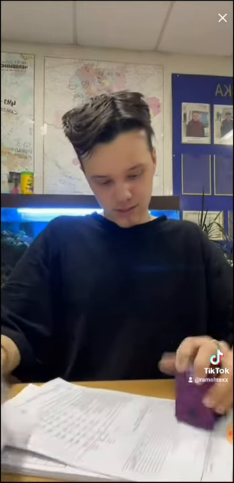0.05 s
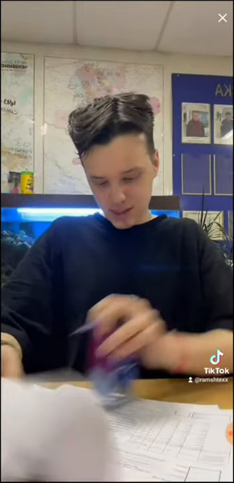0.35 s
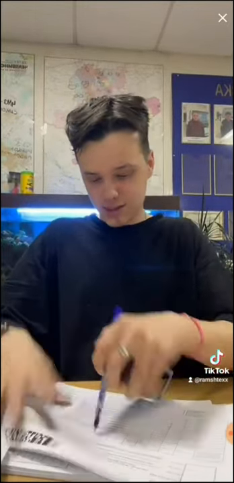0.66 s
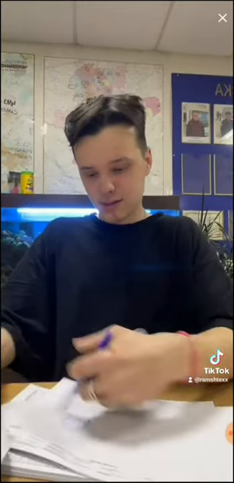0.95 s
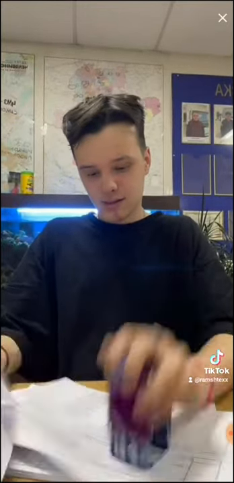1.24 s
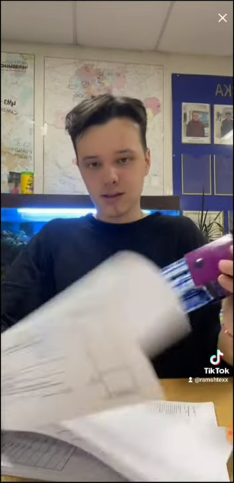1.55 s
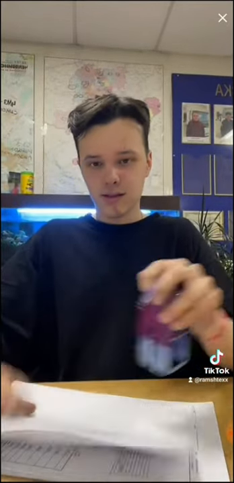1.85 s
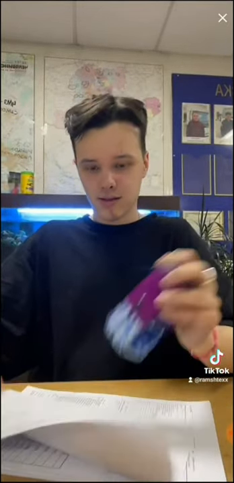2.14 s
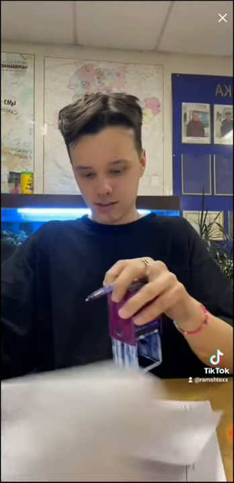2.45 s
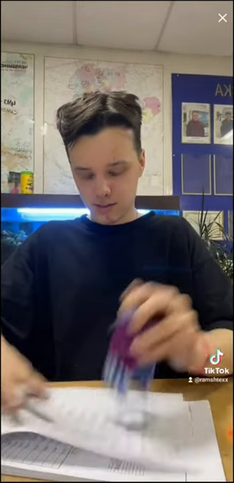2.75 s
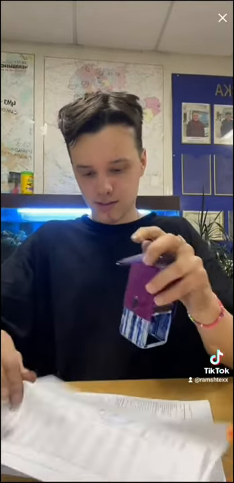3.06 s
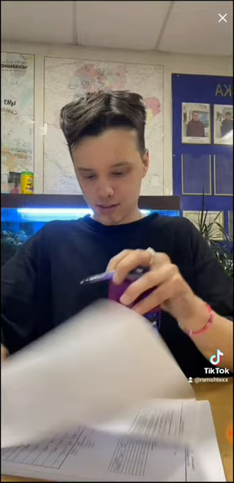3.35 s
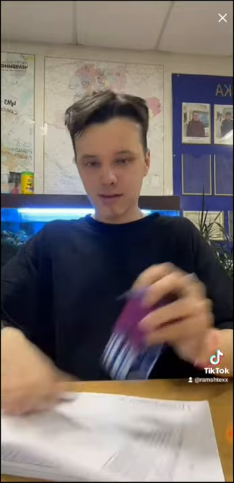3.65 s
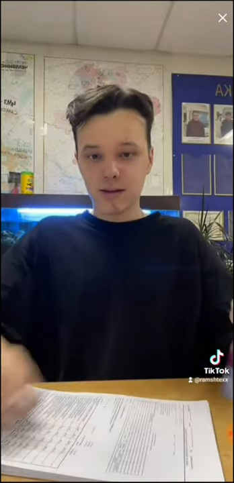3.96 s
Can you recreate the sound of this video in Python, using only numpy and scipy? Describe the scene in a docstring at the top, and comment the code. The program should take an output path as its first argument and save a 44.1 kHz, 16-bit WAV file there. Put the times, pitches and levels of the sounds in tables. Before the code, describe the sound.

A self-inking stamp thumps and clacks rapidly on papers as sheets rustle and flip.

```python
"""Papers are stamped in quick succession on an office desk, close to a phone in a small, humming room. First
the die of a self-inking stamp thuds on the stack, shaking the desk, and the stamp clicks and rattles. Next the
spring throws the housing back with a clack, and it rings against its top stop. Then the housing scrapes down
for the next stroke; the die lands nine times in all. Between strokes the sheets slide, flap and snap as they
are turned; one sings briefly, and later one falls with a puff."""
import sys
import numpy as np
from scipy import signal
from scipy.fft import rfft, irfft
from scipy.io import wavfile
from scipy.ndimage import uniform_filter1d, minimum_filter1d

SR = 44100
rng = np.random.default_rng(int(sys.argv[2]) if len(sys.argv) > 2 else 0)


def transcribe(u):
    """Save the signal u as a 16-bit wav file named by the first command-line argument.

    u: samples, shape (n,) or (channels, n), limited to [-1, 1]; the rate is SR.
    q: integer samples, one column per channel.
    """
    v = np.clip(np.atleast_2d(u).T, -1, 1)
    q = np.round(v * 32767).astype(np.int16)
    wavfile.write(sys.argv[1], SR, q)


N = 176400

# the die lands on the stack (time [s], knock level [dB], desk level [dB])
LANDINGS = [(.0, -22.5, -29.5), (0.23, -17, -33), (.459, -15, -29.5), (.848, -15.5, -28.5),
            (1.2395, -11, -27), (1.696, -16, -31), (2.395, -20, -30.5), (3.043, -20, -30),
            (3.916, -18.5, -36.5)]
# hard clicks of the stamp: the die striking the stack, ticks of the descending housing, and loose plastic parts
# (time [s], body level [dB], treble level [dB])
STAMP_CLICKS = [(0.038, -29, -29.5), (0.23, -28, -25), (0.266, -30.5, -31), (.443, -32, -27), (.524, -27.5, -34),
                (0.792, -26.5, -28), (0.883, -29.5, -31), (0.915, -28.5, -36), (1.163, -29.5, -31),
                (1.23, -32, -25), (1.269, -24, -29), (1.305, -26, -36), (1.313, -27, -29), (1.739, -29, -29),
                (2.437, -33, -35), (3.0407, -29, -26), (3.964, -35, -36)]
# sheets slide (time [s], duration [s], body level [dB], hiss level [dB])
SLIDES = [(0.057, 0.19, -33, -39), (0.268, 0.084, -39, -40), (0.356, 0.11, -32.5, -40.5),
          (0.56, 0.06, -33.5, -41), (0.611, 0.14, -41, -51.5), (0.733, 0.13, -40, -40.5),
          (0.938, 0.24, -37, -43), (1.332, 0.12, -39, -60), (1.471, .12, -36, -38.5),
          (1.601, 0.073, -38.5, -45), (1.814, 0.034, -41, -47), (1.841, 0.12, -40.5, -39.5),
          (2.038, 0.029, -42, -72), (2.088, 0.03, -50.5, -41), (2.151, 0.1, -31.5, -68),
          (2.258, 0.08, -32, -62), (2.463, 0.19, -42.5, -41.5), (2.662, 0.12, -50, -48),
          (2.801, 0.115, -36.5, -40.5), (2.93, 0.074, -34.5, -46.5), (3.058, 0.056, -34, -38),
          (3.119, 0.24, -43, -42.5), (3.355, 0.5, -52, -48.5), (3.727, 0.13, -37.5, -47.5),
          (3.934, 0.16, -35, -46)]
# the spring throws the housing up (time [s], duration [s], level [dB])
RETURNS = [(0.0616, 0.012, -23.5), (.290, 0.0059, -22), (0.535, 0.0049, -12), (0.925, 0.0014, -10.5),
           (1.323, 0.0018, -10.5), (1.764, 0.016, -26), (2.4586, 0.014, -25), (3.111, .013, -24),
           (3.990, 0.0067, -24.5)]
# the housing meets its top stop (time [s], level [dB], tuning [ratio])
STOPS = [(.073, -40, 1.4), (0.299, -25.5, 1), (.540, -15.5, 1.01), (.930, -23.5, 0.99), (1.328, -18, 1.01),
         (1.775, -20, .99), (2.470, -26.5, 1.03), (3.121, -25, 0.98)]
# the housing slides down its frame (time [s], duration [s], level [dB])
PRESSES = [(.193, 0.026, -25.5), (.422, 0.036, -24.5), (.809, 0.023, -24), (1.201, 0.025, -23.5),
           (1.662, 0.032, -22), (2.361, 0.029, -24), (3.006, 0.024, -23), (3.8812, 0.03, -22.5)]
# sheets flap and crumple (time [s], duration [s], body level [dB], treble level [dB])
FLAPS = [(.398, 0.0054, -24, -32), (.753, 0.0076, -28, -26.5), (1.072, 0.0089, -33, -29.5),
         (1.103, 0.012, -27, -26.5), (1.121, 0.015, -30, -26.5), (1.854, 0.021, -28, -31),
         (1.919, 0.005, -27.5, -36), (2.166, 0.029, -30.5, -37), (2.212, 0.0061, -27, -30),
         (2.279, 0.011, -24, -33), (2.538, 0.0075, -27, -46), (2.937, 0.005, -23.5, -29),
         (2.974, 0.0067, -24, -25.5), (3.473, 0.0075, -32.5, -41), (3.541, 0.0074, -34, -33)]
# a sheet buckles (time [s], body level [dB], treble level [dB])
SNAPS = [(.747, -25, -32), (1.048, -28, -41), (1.507, -23.5, -21), (1.585, -30, -27), (1.865, -24, -21.5),
         (1.952, -26.5, -21), (2.165, -24, -24.5), (2.301, -23, -33), (2.5325, -24.5, -26.5),
         (2.6309, -19, -19), (2.817, -22, -22.5), (2.861, -18, -18.5), (2.962, -40, -30), (3.291, -32, -26),
         (3.311, -25, -48), (3.3359, -23, -18.5), (3.601, -23, -25.5)]

# modes of die, coil spring and housing (frequency before tuning [Hz], level [dB], T60 [s])
DIE_MODES = [(723, -9, 0.051), (874, -13.5, 0.081), (1150, -5.5, 0.017), (1476, -14.5, 0.068),
             (1610, -4.5, 0.031), (1770, 3, 0.013)]
COIL_MODES = [(2376, 6.5, 0.021), (2831, -6.5, 0.03)]
HOUSING_MODES = [(880.4, 4.5, 0.043), (874, -22, 0.44), (955, -5, 0.051), (1627, 3, 0.026),
                 (1550, -20, 0.046)]

# spectra of the noisy sources (frequency [Hz], relative level [dB])
AIR_SPECTRUM = [(25, -7), (60, 8), (200, -12), (900, 1.5), (14000, -10)]
DESK_SPECTRUM = [(60, -45), (130, -20.5), (240, -7.5), (600, -3.5), (800, 2.5), (1200, -7), (3000, -14.5),
                 (8000, -21.5)]
BODY_SPECTRUM = [(120, -35), (300, -23.5), (480, -22), (650, -10), (850, -1), (1250, 0), (1600, 3),
                 (2800, 0.5), (4200, -13), (8000, -48)]  # midrange of paper and stamp clicks
HISS_SPECTRUM = [(500, -40), (1800, -18), (3900, 4), (5500, 3.5), (7500, -2), (14000, -8.5)]  # treble of slides and stamp clicks
CLACK_SPECTRUM = [(150, -15.5), (550, -2), (880, 6), (1300, 1), (2500, 9.5), (4500, 7.5), (7500, 3.5),
                  (14000, -5)]
SCRAPE_SPECTRUM = [(150, -29.5), (500, -10.5), (800, 2.5), (1300, -4.5), (2600, 0), (5000, -1), (7500, -6),
                   (14000, -13)]
CRACK_SPECTRUM = [(600, -54), (2300, 6), (4800, 9), (7500, -2.5), (14000, -13)]  # treble of flaps and snaps
# response of the phone's microphone (frequency [Hz], gain [dB])
MICROPHONE = [(20, -6), (1650, 1), (2000, -3.5), (2400, 0), (2850, 2.5), (3350, -9), (4000, -0.5),
              (4600, -6.5), (6700, -1), (7500, 8), (8600, -3), (10000, -16.5), (11400, -9), (12700, -26),
              (15000, -26.5)]


def undb(db):
    """Amplitude ratio of a level in decibels."""
    return 10 ** (np.asarray(db) / 20)


def clock(seconds):
    """Sampled time axis of a given duration."""
    return np.arange(max(int(seconds * SR), 8)) / SR


def decay(t, t60):
    """Exponential damping: 60 dB down after t60 seconds."""
    return np.exp(-np.log(1000) * t / t60)


def add(track, start, sound):
    """Superposition: a sound joins a track at its start time."""
    i = int(np.clip(start * SR, 0, N - 1))
    track[i:i + len(sound)] += sound[:N - i]


def response(points, size=2048):
    """Minimum-phase impulse response of a spectrum, by folding its cepstrum."""
    hz, db = np.array(points, float).T
    f = np.maximum(np.fft.rfftfreq(size, 1 / SR), 1)
    cepstrum = irfft(np.log(undb(np.interp(np.log(f), np.log(hz), db))))
    cepstrum[1:size // 2] *= 2
    cepstrum[size // 2 + 1:] = 0
    return irfft(np.exp(rfft(cepstrum)))


def colour(x, spectrum):
    """A unit-energy filter shapes a white sound and conserves its power."""
    impulse = response(spectrum)
    return signal.fftconvolve(x, impulse / np.linalg.norm(impulse))[:N]


def wander(rate_hz):
    """Random modulation: Gaussian values joined by straight lines."""
    return np.interp(np.arange(N) * rate_hz / SR, np.arange(N), rng.standard_normal(N))


def grit(smooth, even_s=.003, clicks_per_s=2500, spread_db=4):
    """Shot noise of uneven clicks over a share of smooth friction, at steady power."""
    clicks = (rng.random(N) < clicks_per_s / SR) * rng.choice([-1, 1], N)
    clicks = clicks * undb(spread_db * rng.standard_normal(N))
    x = clicks / clicks.std() + smooth * rng.standard_normal(N)
    return x / np.sqrt(uniform_filter1d(x * x, int(even_s * SR)) + 1e-9)


def bursts(rows, attack_s, t60):
    """Envelope of incoherent bursts (time [s], duration [s], level [dB]), which add in power."""
    power = np.zeros(N)
    for start, length, db in rows:
        t = clock(length + t60)
        envelope = undb(db) * np.minimum(t / attack_s, 1) * decay(np.maximum(t - length, 0), t60)
        add(power, start, envelope ** 2)
    return np.sqrt(power)


def ring(modes, blows, contact_s, scatter=.012):
    """Free vibration: each blow (time [s], level [dB], tuning [ratio]) excites damped modes."""
    out, t = np.zeros(N), clock(.5)
    hz, mode_db, t60 = np.array(modes, float).T[:, :, None]
    for start, db, tuning in blows:
        tuned_hz = hz * tuning * (1 + scatter * rng.standard_normal(hz.shape))
        waves = np.sin(2 * np.pi * (tuned_hz * t + rng.random(hz.shape)))
        ringing = np.sum(undb(mode_db) * waves * decay(t, t60), axis=0)
        add(out, start, undb(db) * np.minimum(t / contact_s, 1) * ringing)
    return out


def crackles(rows, treble_spectrum, attack_s, body_t60, treble_t60, smooth):
    """Runs of clicks in two bands, each with its own damping."""
    body = bursts([(start, length, db) for start, length, db, _ in rows], attack_s, body_t60)
    treble = bursts([(start, length, db) for start, length, _, db in rows], attack_s, treble_t60)
    return colour(body * grit(smooth), BODY_SPECTRUM) + colour(treble * grit(smooth), treble_spectrum)


def office_air(air_db=-50.5, hum_hz=60, hum_db=-71):
    """Stationary background: broadband air noise and a pure tone of mains hum."""
    hum = np.sqrt(2) * np.sin(2 * np.pi * hum_hz * np.arange(N) / SR)
    return undb(air_db) * colour(rng.standard_normal(N), AIR_SPECTRUM) + undb(hum_db) * hum


def die_knocks(tuning=.98):
    """Impact excites the modes of the die on the stack."""
    return ring(DIE_MODES, [(start, db, tuning) for start, db, _ in LANDINGS], contact_s=.0012)


def desk_shudder(coupling_db=-15.5):
    """Structure-borne sound: each landing, and a share of each scrape, shakes the desk."""
    shake = bursts([(start, 0, db) for start, _, db in LANDINGS], attack_s=.00091, t60=.31)
    shake += undb(coupling_db) * bursts(PRESSES, attack_s=.0029, t60=.024)
    return colour(shake * rng.standard_normal(N), DESK_SPECTRUM)


def room(x, t60=.57, tail_db=-14.5, build_s=.015):
    """Reverberation: a diffuse field builds up and decays behind the direct sound."""
    t = clock(.5)
    tail = rng.standard_normal(len(t)) * decay(t, t60) * np.minimum(t / build_s, 1)
    return x + undb(tail_db) * signal.fftconvolve(x, tail / np.linalg.norm(tail))[:N]


def stamp_clicks(hold_s=.0041):
    """Small hard impacts in the stamp (the die striking, the housing ticking, loose parts rattling), whose
    treble is damped first."""
    rows = [(start, hold_s, db, treble_db) for start, db, treble_db in STAMP_CLICKS]
    return crackles(rows, HISS_SPECTRUM, attack_s=.00039, body_t60=.025, treble_t60=.015, smooth=.43)


def paper_slides(flutter_hz=108.9, depth_db=5):
    """Sliding friction between sheets: a shivering rustle under a steadier hiss."""
    body, hiss = np.zeros(N), np.zeros(N)
    for start, length, db, hiss_db in SLIDES:
        swell = abs(np.sin(np.pi * clock(length) / length)) ** .26  # the sheet speeds up, then slows
        swell /= np.sqrt(np.mean(swell ** 2))
        add(body, start, undb(db) * swell)
        add(hiss, start, undb(hiss_db) * swell)
    flutter_db = depth_db * np.tanh(wander(flutter_hz))
    body *= undb(flutter_db) * grit(smooth=.25, even_s=.023)
    hiss *= undb(.85 * flutter_db) * grit(smooth=1.3, even_s=.0097)
    return colour(body, BODY_SPECTRUM) + colour(hiss, HISS_SPECTRUM)


def bend(x, bands=14, lowest_hz=500, rate_hz=35, depth_db=5):
    """A sheet's resonances shift as it bends, so third-octave bands trade power at random."""
    hz = np.maximum(np.fft.rfftfreq(N, 1 / SR), 1)
    band = np.clip(3 * np.log2(hz / lowest_hz), 0, bands - 1)
    gains = undb(depth_db * np.array([wander(rate_hz) for _ in range(bands)]))
    gains /= np.sqrt(np.mean(gains ** 2, axis=0))
    spectrum = rfft(x)
    return sum(gain * irfft(spectrum * np.maximum(1 - abs(band - k), 0), N)
               for k, gain in enumerate(gains))


def disperse(x, delay_at_1khz_s=.0023):
    """Dispersion: bending waves run faster at high frequency, so clicks leave a sheet as falling chirps."""
    hz = np.fft.rfftfreq(N, 1 / SR)
    phase_lag = 4 * np.pi * delay_at_1khz_s * np.sqrt(1000 * hz)
    return irfft(rfft(x) * np.exp(-1j * phase_lag), N)


def spring_return(tuning=.96, stop_click_db=-8):
    """Stored elastic energy is released: a bright clack, a twang of the coil, a click at the stop."""
    clicks = [(start, 0, db + stop_click_db) for start, db, _ in STOPS]
    clack = bursts(RETURNS + clicks, attack_s=.00025, t60=.032) * grit(smooth=.25)
    twang = ring(COIL_MODES, [(start, db, tuning) for start, _, db in RETURNS], contact_s=.0042)
    return colour(clack, CLACK_SPECTRUM) + twang


def housing_knocks():
    """The hollow housing resonates on striking its top stop."""
    return ring(HOUSING_MODES, STOPS, contact_s=.00088)


def frame_scrape(slip_hz=124.7, jitter=.25, fade_db=19.5, rise_s=.0034):
    """Stick-slip friction: the descending housing catches on its frame; each slip starts hard and fades."""
    cycles = np.cumsum(slip_hz * np.exp(jitter * wander(slip_hz))) / SR + rng.random()
    slips = uniform_filter1d(undb(-fade_db * (cycles % 1)), int(rise_s * SR))
    slips /= np.sqrt(np.mean(slips ** 2))
    scrape = bursts(PRESSES, attack_s=.0013, t60=.052) * slips * grit(smooth=.51)
    return colour(scrape, SCRAPE_SPECTRUM)


def paper_flaps():
    """A sheet crumples as it flaps over and radiates a run of impulses."""
    return crackles(FLAPS, CRACK_SPECTRUM, attack_s=.00029, body_t60=.03, treble_t60=.02, smooth=.25)


def paper_snaps(t60=.0096, tail_db=7, energy_s=.0022):
    """Buckling: a sheet gives way in one impulse with a crinkling tail."""
    body, treble = np.zeros(N), np.zeros(N)
    t = clock(t60)
    for start, db, treble_db in SNAPS:
        tail = rng.standard_normal(len(t)) * decay(t, t60)
        snap = (t == 0) + undb(tail_db) * tail / np.linalg.norm(tail)
        snap *= np.sqrt(energy_s * SR) / np.linalg.norm(snap)  # as much as unit power for energy_s
        add(body, start, undb(db) * snap)
        add(treble, start, undb(treble_db) * snap)
    return colour(body, BODY_SPECTRUM) + colour(treble, CRACK_SPECTRUM)


def edge_swish(start=1.36, length=.062, db=-39.5, hz=2700, width_hz=210):
    """Friction drives a narrow resonance: the edge of a dragged sheet sings."""
    note = signal.lfilter(*signal.iirpeak(hz, hz / width_hz, fs=SR), rng.standard_normal(N))
    return bursts([(start, length, db)], attack_s=.0088, t60=.033) * note / note.std()


def air_puff(start=2.16, length=.063, db=-36, hz=46.3):
    """Air displaced by a falling sheet makes one low-frequency pressure pulse."""
    out, t = np.zeros(N), clock(length)
    add(out, start, undb(db) * np.hanning(len(t)) * np.sin(2 * np.pi * hz * t))
    return out


def scene():
    """Superposition: stamp and papers reverberate in the room, over the office air and the puff."""
    papers = disperse(paper_snaps() + bend(paper_flaps() + paper_slides())) + edge_swish()
    downstrokes = frame_scrape() + die_knocks() + desk_shudder()
    upstrokes = spring_return() + housing_knocks()
    return (room(downstrokes + upstrokes + stamp_clicks() + papers) + office_air() + air_puff())[None]


def record(dry):
    """Transduction: the phone's microphone colours the sound; a limiter and a low-pass filter follow."""
    limit_db, limit_s, cutoff_hz = -10.2, .002, 15700
    x = signal.fftconvolve(dry[0], response(MICROPHONE))[:N]
    span = int(limit_s * SR)
    gain = np.minimum(1, undb(limit_db) / (abs(x) + 1e-9))
    gain = uniform_filter1d(minimum_filter1d(gain, 2 * span), span)
    lowpass = signal.ellip(8, .2, 70, cutoff_hz, fs=SR, output="sos")
    return signal.sosfilt(lowpass, x * gain)[None]


dry = scene()
out = record(dry)
transcribe(out)
```